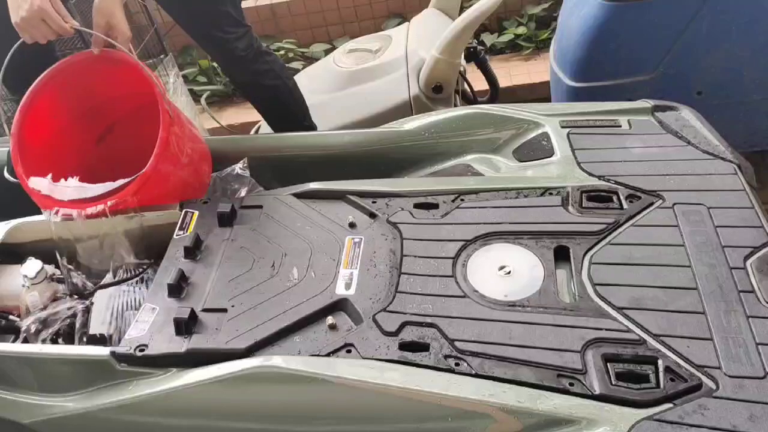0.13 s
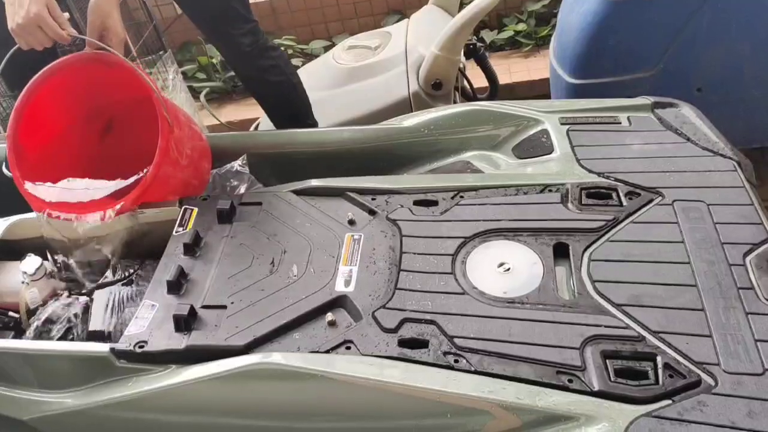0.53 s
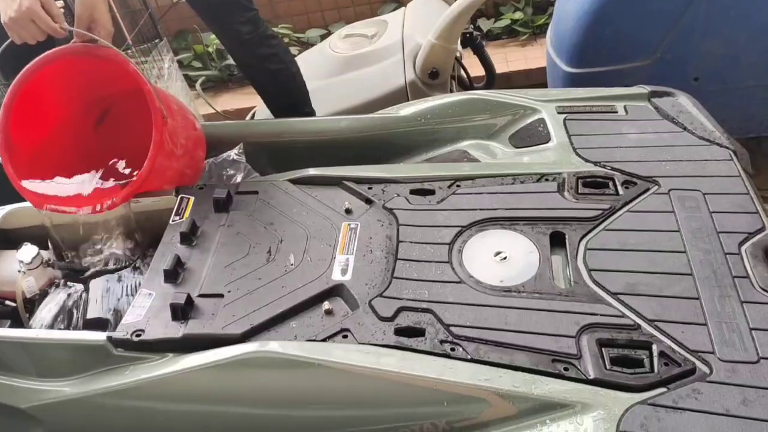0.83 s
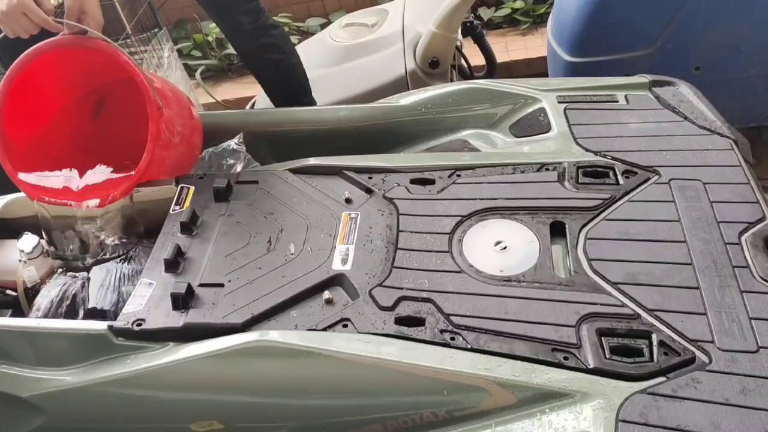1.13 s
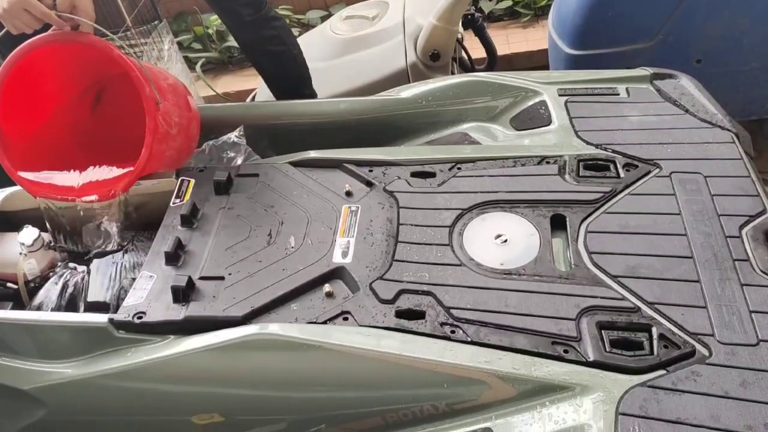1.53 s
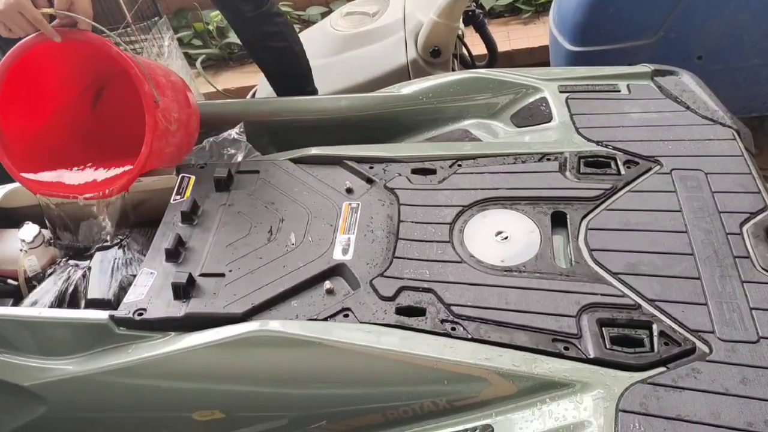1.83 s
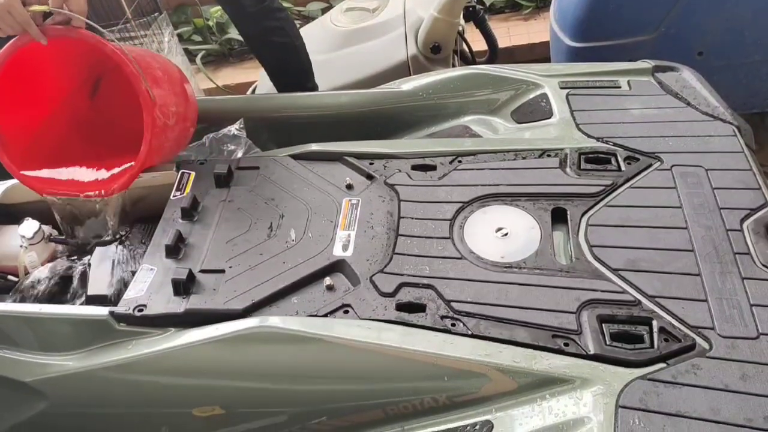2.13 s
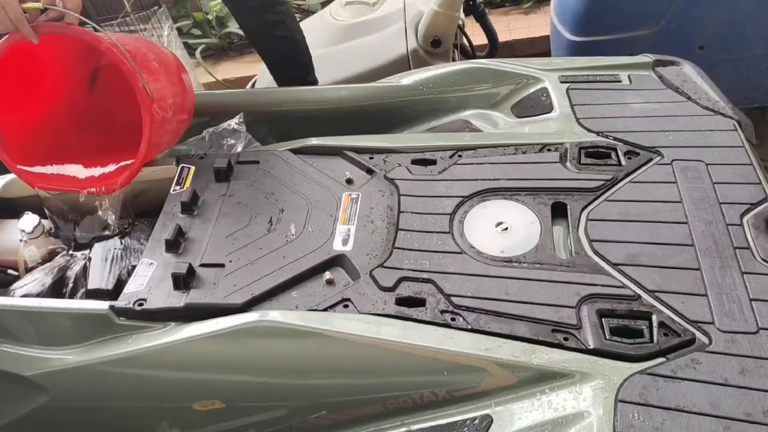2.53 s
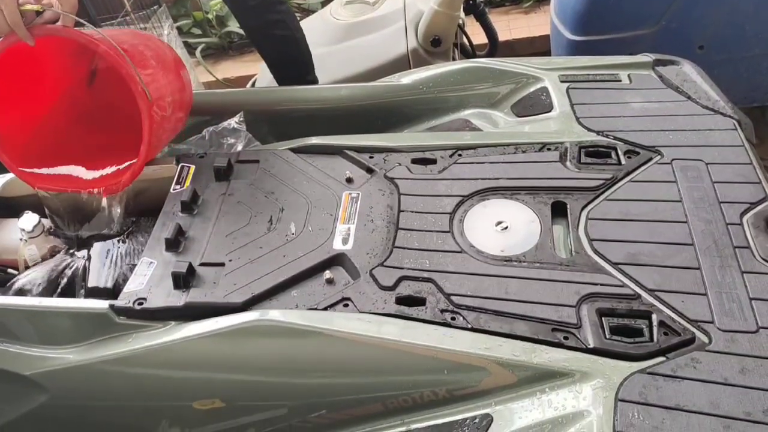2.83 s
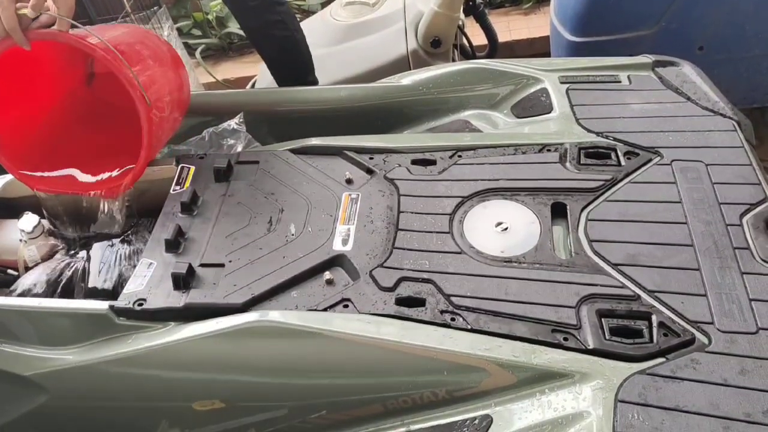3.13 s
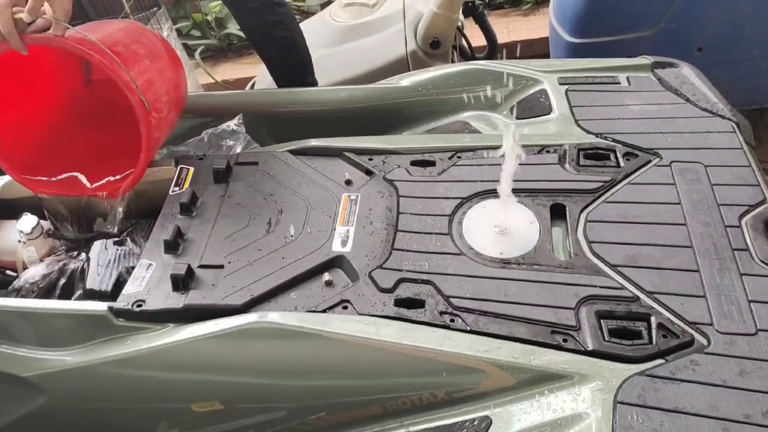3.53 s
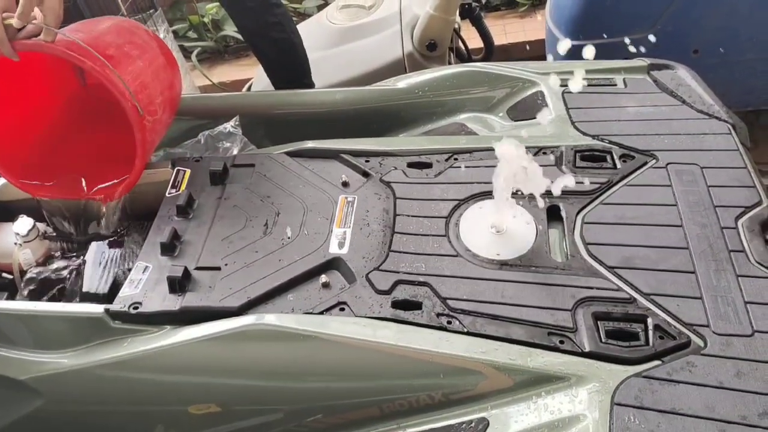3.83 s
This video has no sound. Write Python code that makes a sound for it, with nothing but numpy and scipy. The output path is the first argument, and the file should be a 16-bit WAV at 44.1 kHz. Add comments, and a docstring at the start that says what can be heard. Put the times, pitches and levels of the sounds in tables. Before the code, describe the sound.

Poured water splashes and drums inside a small hull, with a sudden crackling spurt near the end

```python
"""A bucket of water is poured into the open hull of a small boat, heard in mono from close by.
After 0.2 s of silence the stream patters on the parts inside (filtered drops, bubbles, noise) and drums
on the shell (filtered slaps, rumble, thumps); the cavity booms (wavering sine), most from about 2.1 s.
From 3.4 s a vent in the deck spits (filtered bursts that ring its pipe), sizzles (noise bursts) and
plops (short tones), then gurgles (falling resonance)."""
import sys
import numpy as np
from scipy import signal
from scipy.fft import rfft, irfft
from scipy.io import wavfile

SR = 44100
rng = np.random.default_rng(int(sys.argv[2]) if len(sys.argv) > 2 else 0)


def bounce(signal):
    """Save signal as a 16-bit WAV file at the path given by the first command-line argument."""
    frames = np.transpose(np.atleast_2d(signal))
    limited = np.clip(frames, -1, 1)
    pcm = np.round(limited * 32767).astype(np.int16)
    wavfile.write(sys.argv[1], SR, pcm)


N = 176400
TIME_S = np.arange(N) / SR

# stream: (time [s], splash level [dB], fine spray level [dB])
STREAM_LEVELS = [(.2, -54.5, -57), (.3, -54, -56), (.45, -50.5, -53.5), (.75, -49.5, -52.5),
                 (1.1, -48.5, -51), (1.6, -47.5, -50.5), (2, -47.5, -52), (2.4, -48, -54), (3.1, -49, -54),
                 (3.45, -47, -55.5), (3.8, -48, -57), (4, -49, -54)]
# spectra of splash and spray: (frequency [Hz], relative level [dB])
SPLASH_SPECTRUM = [(150, 1), (245, -0.5), (300, 5.5), (360, 0.5), (440, -1), (540, 3.5), (650, -1),
                   (800, -1.5), (1050, 0), (1280, -3), (1430, -4.5), (1620, -6), (2000, -3), (2280, -3.5),
                   (2500, -0.5), (3100, -5), (3700, -3.5), (4300, -5), (5200, -13.5), (6200, -12),
                   (7500, -6.5), (8100, -57), (9300, -27.5), (11200, -19), (12000, -19)]
SPRAY_SPECTRUM = [(3000, -14), (4300, -4), (4750, 1), (5250, 4.5), (6100, -1.5), (6900, 1.5), (7600, -3.5),
                  (7900, -8.5), (8150, -56), (9000, -46), (10300, -38), (12000, -23)]
# part ringing under the stream: (time [s], level [dB], pitch [Hz])
RINGING_PART = [(.2, -70, 2060), (1, -63, 2030), (1.47, -64.5, 2040), (1.55, -52.5, 2060), (1.8, -55, 2095),
                (1.95, -57.5, 2070), (2.4, -61, 2090), (2.7, -63.5, 2050), (3.4, -63.5, 2060),
                (4, -58, 1990)]
# weight of water on the shell: (time [s], drumming level [dB])
DRUM_LEVELS = [(.2, -54), (.33, -54.5), (.45, -48.5), (.75, -47), (1.1, -44), (1.5, -45), (2.05, -43.5),
               (2.2, -45), (3.2, -46), (3.55, -42), (3.7, -50.5), (4, -47)]
# deepest rumble: (time [s], level [dB])
RUMBLE_LEVELS = [(.2, -71), (.32, -69), (.45, -51.5), (.7, -52), (.87, -47), (1, -58), (1.4, -48),
                 (1.65, -59), (4, -64)]
# spectra of drumming and rumble: (frequency [Hz], relative level [dB])
SHELL_SPECTRUM = [(25, -55.5), (50, -10.5), (65, 3), (85, 2.5), (105, -2.5), (140, 0.5), (190, -3.5),
                  (250, -10.5), (330, -16), (600, -50.5)]
RUMBLE_SPECTRUM = [(10, -15), (25, -9), (39, 9.5), (52, 4), (90, 5), (200, -64)]
# boom of the hull cavity: (time [s], level [dB])
BOOM_LEVELS = [(.2, -83), (.5, -58), (.65, -43), (.9, -79), (2.08, -53), (2.25, -37.5), (2.5, -44.5),
               (2.75, -41.5), (2.9, -46), (3.22, -38), (3.45, -39.5), (3.6, -47.5), (3.72, -56),
               (3.87, -48), (4, -52)]
# slugs of water on the shell: (time [s], envelope peak [dB], pitch [Hz])
THUMPS = [(0.454, -36.5, 92), (0.609, -34.5, 90), (0.716, -32, 101), (1.013, -37.5, 94), (1.116, -35, 90),
          (1.143, -40, 135), (1.28, -33, 80), (1.412, -37.5, 234), (1.473, -32.5, 104), (1.509, -32.5, 97),
          (1.564, -34.5, 108), (1.639, -36, 70), (1.783, -37, 89), (1.989, -35, 148), (2.049, -34, 86),
          (2.877, -28.5, 149), (3.017, -32, 144), (3.301, -30, 144), (3.387, -29.5, 127), (3.491, -33, 112),
          (3.522, -38, 235)]
# water spat by the vent: (time [s], rms at envelope peak [dB], rise [s], tilt [dB/octave])
SPITS = [(3.44, -49, 0.035, -6), (3.556, -40, 0.012, 0), (3.578, -30.5, 0.0033, 4),
         (3.5827, -18.5, 0.0016, 1), (3.5905, -25.5, 0.0014, -3), (3.5935, -30.5, 0.0032, 4),
         (3.6, -22, 0.0018, -3), (3.605, -36, 0.0036, -0.5), (3.645, -50.5, 0.042, -2)]
# single clicks among the spits: (time [s], peak [dB], tilt [dB/octave])
CRACKS = [(3.5851, -18, 3), (3.5863, -10, -0.5), (3.6007, -25, -6.5)]
# spectrum of spits and cracks: (frequency [Hz], relative level [dB])
SPIT_SPECTRUM = [(200, -24), (450, -15), (900, -22), (1200, -19), (1450, -11), (1750, -10), (2100, -12),
                 (2430, 2), (2850, 0.5), (3400, 0), (3650, -3), (3950, -10), (4450, -11), (4700, 0.5),
                 (5050, -12), (5350, -4), (6100, -23.5), (6900, -9), (7600, -14), (8700, -28), (10000, -26),
                 (11000, -16), (12000, -16.5)]
# modes of the vent's pipe: (frequency [Hz], relative level [dB], t60 [s])
PIPE_MODES = [(1425, -1, 0.13), (2200, -6, 0.12), (2440, 2, 0.12), (2765, -3, 0.06), (3020, -16, .06),
              (3270, -4, 0.06), (3500, -4, 0.07), (3585, -6, 0.07), (4635, 0.5, 0.11)]
# air through the wet vent: (time [s], rms at envelope peak [dB], rise [s])
SIZZLES = [(3.466, -51, 0.013), (3.477, -44, 0.0011), (3.508, -35, 0.0014), (3.533, -34, 0.0017),
           (3.539, -37.5, 0.0014), (3.556, -45, 0.0078), (3.585, -31.5, 0.0018), (3.603, -42, 0.0062)]
# spectrum of the sizzle: (frequency [Hz], relative level [dB])
SIZZLE_SPECTRUM = [(3000, -19), (6300, -20), (7000, -1), (7450, 3), (7850, -7), (8600, -27), (10000, -28),
                   (11500, -15), (12200, -21)]
# bubbles in the vent: (time [s], envelope peak [dB], pitch [Hz])
PLOPS = [(3.467, -37.5, 2620), (3.5985, -27.5, 1440), (3.6012, -24, 2480), (3.672, -37, 2240)]

DROPS_PER_S, DROP_SPREAD_DB, WASH_POWER_SHARE, FLUTTER_RMS_DB = 2400, 2.5, 0.58, 0.8
# decay time in cycles; pitch rise as a fraction per decay time
BUBBLES_PER_S, BUBBLE_DB, BUBBLE_DECAY_CYCLES, BUBBLE_RISE = 420, -11, 14.6, 0.04
PART_WIDTH_HZ = 180
HULL_T60_S, HULL_ECHO_DB = 0.19, -12.5
SLAPS_PER_S = 330
BOOM_HZ, BOOM_WANDER_RMS_HZ, BOOM_WAVER_RMS_DB = 62.86, 1.4, 0.4
THUMP_RISE_S, PLOP_RISE_S = 0.006, 0.0015
SPIT_DROPS_PER_S, SPIT_SPREAD_DB, PIPE_RING_DB = 16000, 2, -11
GURGLE_S, GURGLE_DB, GURGLE_RISE_S = 3.655, -46, 0.022
GURGLE_HZ, GURGLE_OCTAVES_PER_S, GURGLE_WIDTH_HZ = 2380, -1.9, 1050
START_S, EDGE_HZ = 0.193, 12180


def amp(db):
    """Decibels to gain."""
    return 10 ** (np.asarray(db) / 20)


def unit(x):
    """Scales to rms 1."""
    return x / np.sqrt(np.mean(x ** 2) + 1e-20)


def level(table, axis=1):
    """Gain over time from one dB column."""
    rows = np.array(table)
    return amp(np.interp(TIME_S, rows[:, 0], rows[:, axis]))


def add(mix, time_s, sound):
    """Mixes a sound in at time_s."""
    part = mix[round(time_s * SR):][:len(sound)]
    part += sound[:len(part)]


def drift(hz):
    """Smooth random motion up to about a rate, rms 1."""
    f = np.fft.rfftfreq(N, 1 / SR)
    lowpass = np.exp(-(f / hz) ** 2) * (f > 0)
    return unit(irfft(rfft(rng.standard_normal(N)) * lowpass, N))


def colour(x, points, tilt_db=0, size=8192):
    """Minimum-phase filter of unit energy that follows a spectrum, tilted per octave."""
    f, db = np.transpose(points)
    octave = np.log2(abs(np.fft.fftfreq(size, 1 / SR)) + 1)
    tilted_db = db + tilt_db * np.log2(f / f[0])
    log_gain = np.log(amp(np.interp(octave, np.log2(f), tilted_db)))
    # the Hilbert transform of the log gain gives the causal phase
    taps = np.fft.ifft(np.exp(np.conj(signal.hilbert(log_gain)))).real[:size // 2]
    return signal.fftconvolve(x, taps / np.linalg.norm(taps))[:N]


def resonate(x, hz, width_hz):
    """Two-pole-pair resonance that follows the curve hz, rms 1."""
    turn = np.exp(2j * np.pi * np.cumsum(hz) / SR)
    r = np.exp(-np.pi * width_hz / SR)
    # shift the resonance to 0 Hz, filter, shift back
    return unit((turn * signal.lfilter([1], [1, -2 * r, r * r], x / turn)).real)


def impacts(per_s, spread_db):
    """Random clicks of either sign with exponentially spread dB sizes, rms 1."""
    size = amp(spread_db * np.minimum(rng.exponential(1, N), 5))
    hits = rng.random(N) < per_s / SR
    return unit(size * rng.choice([-1, 1], N) * hits)


def swell(t, rise_s):
    """Rises to 1 at rise_s and dies away."""
    return t / rise_s * np.exp(1 - t / rise_s)


def patter():
    """Drop impacts over a wash of countless tiny ones."""
    drops = impacts(DROPS_PER_S, DROP_SPREAD_DB)
    wash = rng.standard_normal(N)
    return np.sqrt(1 - WASH_POWER_SHARE) * drops + np.sqrt(WASH_POWER_SHARE) * wash


def bubbles(low_hz, high_hz, count=64):
    """Short rising pings of bubbles of many sizes, smaller ones higher and briefer."""
    out, t = np.zeros(N), np.arange(2048) / SR
    for hz in np.geomspace(low_hz, high_hz, count) * rng.uniform(.97, 1.03, count):
        age = t * hz / BUBBLE_DECAY_CYCLES
        turns = hz * t * (1 + BUBBLE_RISE * np.minimum(age, 5) / 2)
        ping = unit(np.exp(-age) * np.sin(2 * np.pi * turns))
        starts = impacts(BUBBLES_PER_S / count, spread_db=0)
        out += signal.oaconvolve(starts, ping)[:N] * np.sqrt(hz)
    return unit(out)


def stream():
    """Splash, bubbles, spray and a ringing part flutter together as the stream wobbles."""
    flutter = amp(FLUTTER_RMS_DB * drift(14))
    splash = unit(colour(patter() + amp(BUBBLE_DB) * bubbles(450, 5500), SPLASH_SPECTRUM))
    spray = unit(colour(patter(), SPRAY_SPECTRUM))
    time_s, _, hz = np.transpose(RINGING_PART)
    part = resonate(patter(), np.interp(TIME_S, time_s, hz), PART_WIDTH_HZ)
    out = level(STREAM_LEVELS) * splash
    out += level(STREAM_LEVELS, axis=2) * spray
    out += level(RINGING_PART) * part
    return flutter * out


def hull_echo(x):
    """Short, dense reflections inside the open hull, as a decaying noise tail."""
    t = np.arange(SR // 4) / SR
    tail = rng.standard_normal(len(t)) * amp(-60 * t / HULL_T60_S) * (t > .002)
    return x + amp(HULL_ECHO_DB) * signal.fftconvolve(x, tail / np.linalg.norm(tail))[:N]


def shell_drumming():
    """Random slaps of water excite the shell, over a deep noise rumble."""
    drum = unit(colour(impacts(SLAPS_PER_S, spread_db=-0.5), SHELL_SPECTRUM))
    rumble = unit(colour(rng.standard_normal(N), RUMBLE_SPECTRUM))
    return level(DRUM_LEVELS) * drum + level(RUMBLE_LEVELS) * rumble


def cavity_boom():
    """The cavity's resonance as a sine that wanders in pitch and wavers in level."""
    turns = np.cumsum(BOOM_HZ + BOOM_WANDER_RMS_HZ * drift(7.1)) / SR
    waver = amp(BOOM_WAVER_RMS_DB * drift(13))
    return level(BOOM_LEVELS) * waver * unit(np.sin(2 * np.pi * turns))


def shell_thumps():
    """Heavy slugs thump the shell: low tones under a squared swell."""
    out, t = np.zeros(N), np.arange(SR // 10) / SR
    for time_s, db, hz in THUMPS:
        add(out, time_s, amp(db) * swell(t, THUMP_RISE_S) ** 2 * np.sin(2 * np.pi * hz * t))
    return out


def vent_spits():
    """Bursts of drops and single cracks leave the vent and ring the modes of its pipe."""
    spits, t = np.zeros(N), np.arange(SR // 4) / SR
    for time_s, db, rise_s, tilt_db in SPITS:
        push = amp(db) * swell(t, rise_s)
        drops = impacts(SPIT_DROPS_PER_S, SPIT_SPREAD_DB)[:len(t)]
        burst = colour(push * drops, SPIT_SPECTRUM, tilt_db)
        add(spits, time_s, burst * np.linalg.norm(push) / np.linalg.norm(burst))
    for time_s, db, tilt_db in CRACKS:
        crack = colour(np.ones(1), SPIT_SPECTRUM, tilt_db)
        add(spits, time_s, amp(db) * crack / abs(crack).max())
    pipe = np.zeros(N)
    for hz, db, t60_s in PIPE_MODES:
        mode = amp(-60 * t / t60_s) * np.sin(2 * np.pi * hz * t)
        pipe += amp(db) * unit(signal.oaconvolve(spits, mode)[:N])
    return spits + amp(PIPE_RING_DB) * spits.std() * unit(pipe)


def vent_sizzle():
    """Air sizzles through the wet vent: swelling bursts of filtered noise."""
    air, t = np.zeros(N), np.arange(SR // 4) / SR
    for time_s, db, rise_s in SIZZLES:
        add(air, time_s, amp(db) * swell(t, rise_s) * rng.standard_normal(len(t)))
    return colour(air, SIZZLE_SPECTRUM)


def vent_plops():
    """Bubbles plop in the vent: brief tones of fixed pitch."""
    out, t = np.zeros(N), np.arange(SR // 4) / SR
    for time_s, db, hz in PLOPS:
        add(out, time_s, amp(db) * swell(t, PLOP_RISE_S) * np.sin(2 * np.pi * hz * t))
    return out


def gurgle():
    """Water sinks back in the vent, and the ring of the air above it falls."""
    t = np.maximum(TIME_S - GURGLE_S, 0)
    hz = GURGLE_HZ * 2 ** (GURGLE_OCTAVES_PER_S * t)
    ring = resonate(patter(), hz, GURGLE_WIDTH_HZ)
    return amp(GURGLE_DB) * swell(t, GURGLE_RISE_S) * ring


def scene():
    """Sums all sources, the same in both ears; only the stream gets the hull echo."""
    mono = hull_echo(stream())
    mono += shell_drumming() + cavity_boom() + shell_thumps()
    mono += vent_spits() + vent_sizzle() + vent_plops() + gurgle()
    return np.array([mono, mono])


def record(dry):
    """The microphone opens a moment late, over 2 ms; then a steep low-pass limits the band."""
    opened = dry * np.clip((TIME_S - START_S) / .002, 0, 1)
    lowpass = signal.firwin(401, EDGE_HZ, window=("kaiser", 9), fs=SR)
    return signal.oaconvolve(opened, lowpass[None], "same")


dry = scene()
out = record(dry)
bounce(out)
```